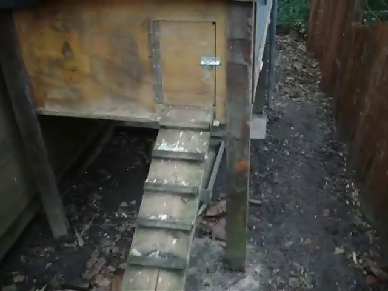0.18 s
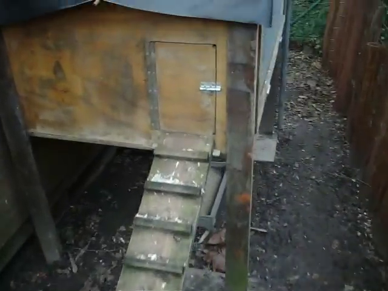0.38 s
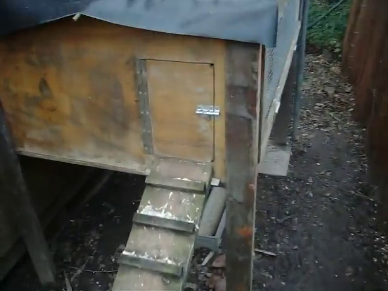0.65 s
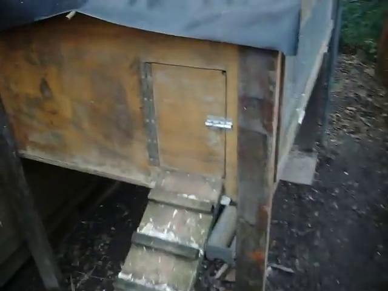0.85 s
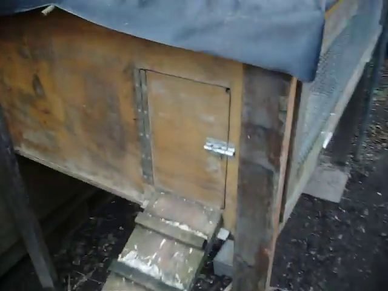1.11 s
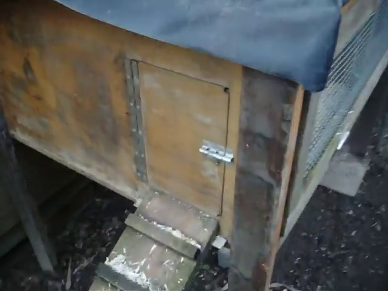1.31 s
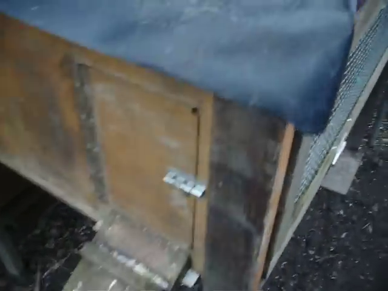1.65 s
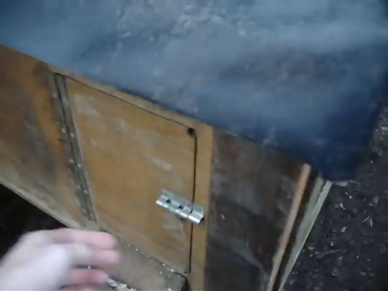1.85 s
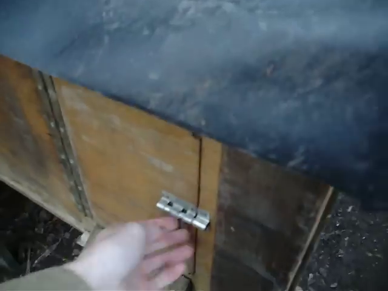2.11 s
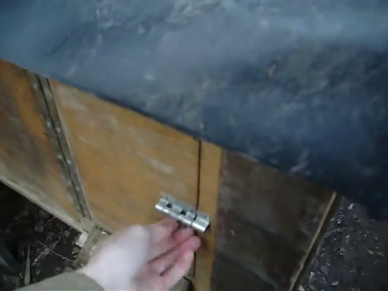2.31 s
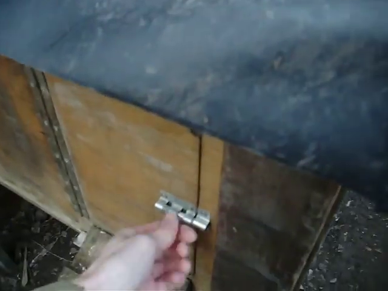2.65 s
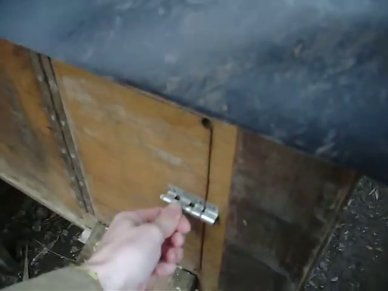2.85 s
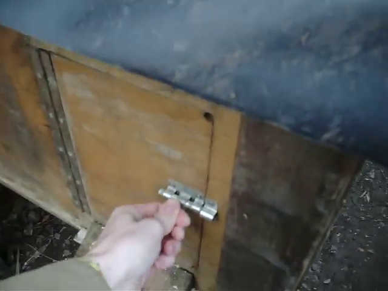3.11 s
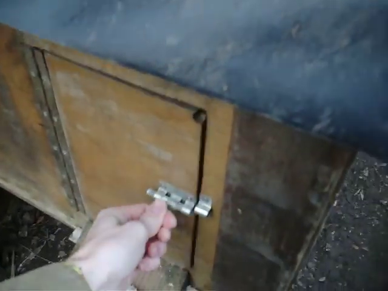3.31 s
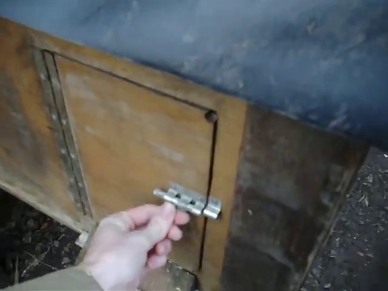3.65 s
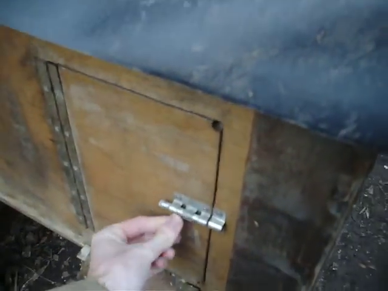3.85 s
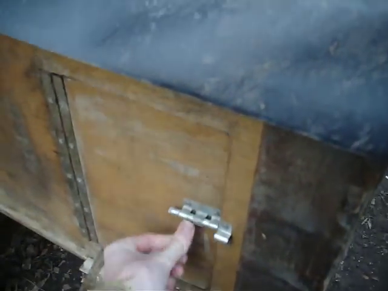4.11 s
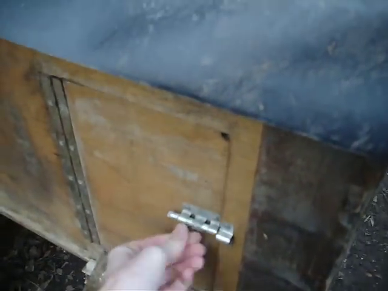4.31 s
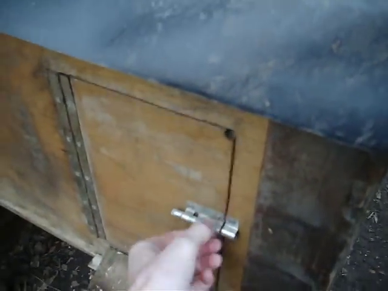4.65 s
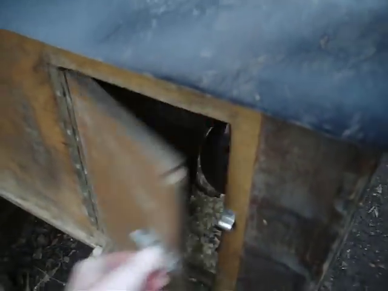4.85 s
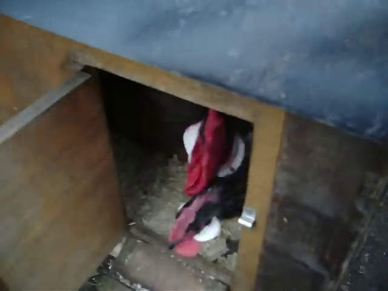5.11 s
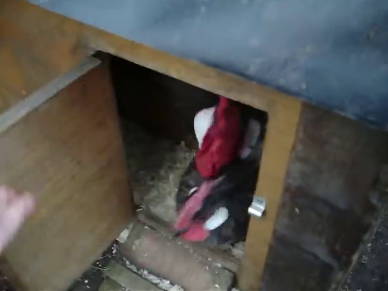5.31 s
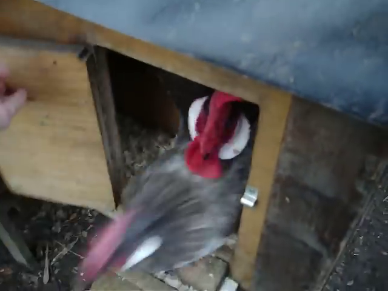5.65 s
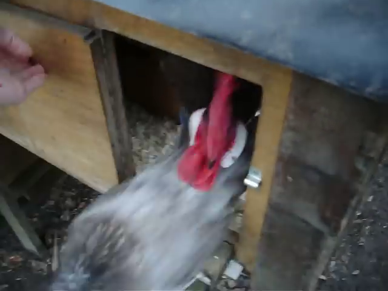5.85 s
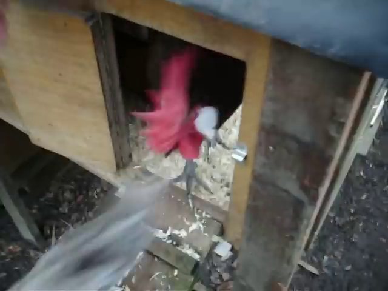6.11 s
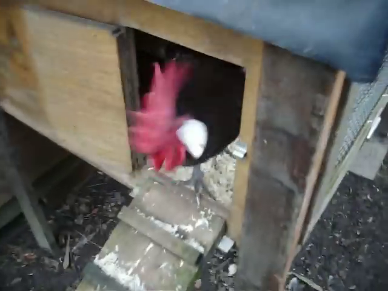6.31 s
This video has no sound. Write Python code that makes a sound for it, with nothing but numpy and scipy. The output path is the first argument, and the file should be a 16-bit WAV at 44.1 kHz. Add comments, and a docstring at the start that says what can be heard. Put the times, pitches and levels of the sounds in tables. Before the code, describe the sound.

A bird peeps high at the start while a shut-in rooster gives short low clucks in a boxy coop. Cloth rustles, wood knocks and a bolt rattles and ticks close by. Two rough rising squawks burst out, distorted, with a brief squeak between them. The door swings with a weak squeal, then a chicken thuds onto the boards. Dull, band-limited sound with faint yard echo.

```python
"""A rooster shut in a wooden coop clucks and squawks twice: syrinx pulses and air through throat resonances.
A hand slides the bolt, which perhaps squeaks, and opens the door; a chicken thumps out: ringing wood and bolt.
Close by, a sleeve rustles and scrapes (shaped noise); a small bird peeps and a hinge squeals (gliding tones).
A distant rumble of noise lies behind, and the near sounds echo round the yard.
The camera's gain control ducks the yard after loud sounds and creeps back; the squawks overload it."""
import sys
import numpy as np
from scipy import signal
from scipy.fft import rfft, irfft
from scipy.io import wavfile
from scipy.ndimage import uniform_filter1d, minimum_filter1d

SR = 44100
rng = np.random.default_rng(int(sys.argv[2]) if len(sys.argv) > 2 else 0)


def store_pcm(level_fs):
    """Save levels as 16-bit WAV."""
    pcm = np.round(np.clip(level_fs, -1, 1) * 32767).astype(np.int16)
    wavfile.write(sys.argv[1], SR, np.atleast_2d(pcm).T)


N = 285768
TIME = np.arange(N) / SR


def amp(db):
    """Decibels to gain."""
    return 10 ** (np.asarray(db) / 20)


def unit(x):
    """Scales to rms 1."""
    return x / np.sqrt(np.mean(x ** 2) + 1e-20)


def read(points, hz):
    """Reads a spectrum on a log-frequency axis."""
    f, value = np.transpose(points)
    return np.interp(np.log(hz + 1), np.log(f), value)


def curves(rows):
    """Sample times across a table, and each of its columns at those times."""
    s, *columns = np.transpose(rows)
    t = np.arange(s[0], s[-1], 1 / SR)
    return [t] + [np.interp(t, s, c) for c in columns]


def add(mix, s, sound):
    """Mixes a sound in from time s, dropping what falls outside the mix."""
    start = round(s * SR)
    sound = sound[max(-start, 0):]
    part = mix[max(start, 0):][:len(sound)]
    part += sound[:len(part)]


def noise(size, shape):
    """Noise whose spectrum is shape(Hz), at rms 1 over at least half a second."""
    total = max(size, SR // 2)
    spectrum = rfft(rng.standard_normal(total))
    shaped = irfft(spectrum * shape(np.fft.rfftfreq(total, 1 / SR)), total)
    return unit(shaped)[:size]


def wobble(size, hz):
    """Random drift, mostly slower than the given rate."""
    return noise(size, lambda f: np.exp(-(f / hz) ** 2))


def resonate(x, hz, width):
    """A two-pole resonance of gain 1 at its peak."""
    return signal.lfilter(*signal.iirpeak(hz, hz / width, SR), x)


def glide(x, hz, width):
    """A resonance of gain 1 that follows a curve: shift down to zero, smooth, shift back."""
    turn = np.exp(2j * np.pi * np.cumsum(hz) / SR)
    r = np.exp(-np.pi * width / SR)
    smooth = signal.lfilter([1 - r], [1, -r], x / turn)
    return 2 * (turn * smooth).real


def low_pass(x, hz):
    """A steep band limit by a symmetric filter, so nothing is delayed."""
    taps = signal.firwin(121, hz, window=("kaiser", 6), fs=SR)
    return signal.oaconvolve(x, taps, "same")


def echo(x, t60_of):
    """Scattered reflections, as a noise tail that builds briefly and dies at its own rate in each band."""
    hz, t, z = signal.stft(rng.standard_normal(SR), SR, nperseg=256)
    decay = amp(-60 * t / t60_of(hz)[:, None])
    tail = signal.istft(z * decay, SR, nperseg=256)[1]
    tail *= np.minimum(np.arange(len(tail)) / (0.0059 * SR), 1) ** 2
    return signal.fftconvolve(x, tail / np.linalg.norm(tail))[:N]


def background():
    """Distant rumble and wash as shaped noise, with clothes close by that rustle at each move of the arm."""
    # colour of the distant yard: f/Hz, relative level per Hz/dB
    yard_colour = [(15, 2), (35, -9), (54, 8), (75, -1.5), (110, -7), (200, -7), (350, -10.5), (720, -13),
                   (1050, -11), (1350, -16), (1700, -24.5), (3000, -26.5), (6000, -34.5)]
    # movements of the arm that rustle the sleeve: t/s at the peak, level/dB, half-length/s
    arm_moves = [(.62, -27.5, 0.19), (1.664, -30.5, 0.18), (5.698, -38.5, 0.9)]
    cloth_colour = [(300, -26.0), (1500, -12), (3000, -6), (5500, -12.0)]  # f/Hz, relative level/dB
    yard_db, cloth_db = -20.5, -35.5  # the yard, and clothes at rest
    yard = noise(N, lambda f: amp(read(yard_colour, f)))
    yard = yard * amp(yard_db + 1.5 * wobble(N, 6.2))
    cloth = noise(N, lambda f: amp(read(cloth_colour, f)))
    cloth = unit(cloth * amp(2.8 * wobble(N, 25) + 2.2 * wobble(N, 500)))  # slow and fine unevenness
    moves = sum(amp(db) * np.exp(-((TIME - s) / length) ** 2) for s, db, length in arm_moves)
    return yard + (amp(cloth_db) + moves) * cloth


def whistle(hz, waver, flutter_db):
    """A thin gliding tone that wavers in pitch and flutters in level."""
    turns = np.cumsum(hz * (1 + waver * wobble(len(hz), 200))) / SR
    return unit(np.sin(2 * np.pi * turns) * amp(flutter_db * wobble(len(hz), 60)))


def peeps():
    """A small bird: each peep bends through one arc of pitch while it swells and fades."""
    # peeps: start t/s, length/s, level/dB, pitch f/Hz at the start, in the middle, at the end
    bird_calls = [(0, 0.086, -11, 3270, 3035, 3330), (0, 0.1, -22, 4450, 4920, 4100),
                  (0.071, .032, -10.5, 3280, 3715, 3490), (2.147, 0.085, -11, 3650, 3662, 3610),
                  (2.653, 0.024, -27.5, 3180, 3130, 2980), (4.185, 0.04, -34, 3450, 3350, 3470)]
    out = np.zeros(N)
    for s, length, db, start_hz, middle_hz, end_hz in bird_calls:
        u = np.linspace(0, 1, round(length * SR))
        arc = np.polyfit([0, .5, 1], [start_hz, middle_hz, end_hz], 2)
        tone = whistle(np.polyval(arc, u), waver=0.0069, flutter_db=1.5)
        add(out, s, amp(db) * np.sin(np.pi * u ** 0.52) * tone)
    return out


def pulses_and_puffs(pitch_hz, rough, jitter):
    """Unsteady pulses, as from a syrinx, mixed with a puff of air in each cycle."""
    size = len(pitch_hz)
    turns = np.cumsum(pitch_hz * (1 + jitter * wobble(size, 220))) / SR
    pulses = 0
    for k in range(1, 36):
        kept = np.clip((6500 - k * pitch_hz) / 500, 0, 1)  # harmonics fade out from 6000 to 6500 Hz
        pulses = pulses + np.cos(2 * np.pi * k * turns) * kept
    puffs = (0.19 + np.exp(-(turns % 1) / 0.5)) * noise(size, np.ones_like)
    rough = np.clip(rough, 0, 1)
    return (1 - rough) * unit(pulses) + rough * unit(puffs)


def clucks_and_squeak():
    """Clucks are a few uneven pulses, rising in pitch, through resonances; a squeak is made the same way."""
    # clucks, and at 3.85 and 3.892 s a squeak near 800 Hz, perhaps of the bolt, made the same way:
    # t/s at the peak, level/dB, half-length/s, pitch f/Hz at the peak,
    # first resonance f/Hz (the throat in a cluck), second f/Hz, second's relative level/dB
    cluck_and_squeak_rows = [(.001, 1, 0.0073, 646, 1303, 2090, -19),
                             (0.096, -17, 0.014, 274, 840, 2250, -8),
                             (.261, -14.5, 0.0073, 226.4, 1075, 2290, -13),
                             (0.451, -12, 0.014, 233.1, 1140, 2210, -8.5),
                             (.608, -10, 0.013, 260.5, 1040, 2370, -10),
                             (1.211, -24, 0.013, 259.4, 1110, 2210, -7.5),
                             (1.334, -13, 0.012, 232.4, 930, 2190, -14.5),
                             (1.572, -14, 0.014, 231.2, 887, 2625, -11.5),
                             (1.982, -7, 0.014, 258, 1117, 2250, -14.5),
                             (2.712, -14, 0.035, 199.2, 557, 1980, -13.5),
                             (3.008, -11.5, 0.012, 247.8, 712, 1910, -12.5),
                             (3.258, -8, 0.014, 223.3, 1250, 2090, -16),
                             (3.85, -21, 0.027, 800, 783, 2330, -6),
                             (3.892, -8, 0.0037, 787, 914, 2330, -3.5),
                             (4.044, -1, 0.0065, 233.9, 704, 1836, -15.5),
                             (4.812, -6.5, 0.0098, 230, 677, 1380, -17),
                             (5.805, 0, 0.0036, 225, 680, 1810, -2),
                             (5.818, -3.5, 0.007, 332, 705, 1870, -7)]
    out, t = np.zeros(N), np.arange(-SR // 12, SR // 12) / SR
    for s, db, length, hz, first_hz, second_hz, second_db in cluck_and_squeak_rows:
        drive = pulses_and_puffs(hz * np.exp(5 * t), rough=.3, jitter=.14)
        drive = drive * amp(2 * wobble(len(t), 200))
        first = resonate(resonate(drive, first_hz, 260), first_hz, 370)
        second = resonate(resonate(drive, second_hz, 290), second_hz, 730)
        low = resonate(resonate(drive, 370, 420), 210, 630)  # the chest in a cluck
        sound = first - amp(second_db) * second + amp(-4) * low
        add(out, s + t[0], amp(db) * unit(sound) * np.exp(-abs(t / length) ** 2.55))
    return out


def scrapes():
    """Short rubs: bands of grainy friction noise that swell and fade."""
    # scrapes of sleeve, feet, straw and bolt, and dull rubs of handling:
    # t/s at the peak, level/dB, half-length/s, centre f/Hz, width/Hz
    rubs = [(.836, -18.5, 0.02, 3840, 3200), (.89, -25, 0.026, 4570, 1800), (.926, -15, 0.0063, 690, 1780),
            (0.95, -21.5, 0.019, 2180, 3600), (.98, -16, 0.0077, 2300, 2870),
            (0.988, -17.5, .079, 170, 216), (1.787, -23, 0.019, 3900, 2970),
            (1.909, -26, 0.026, 3930, 2940), (2.163, -22, 0.04, 3460, 3470),
            (2.179, -12.5, 0.028, 690, 1780), (2.21, -17, 0.044, 130, 90.5),
            (2.51, -11.5, 0.0073, 1300, 2600), (2.832, -16, .011, 3020, 3800),
            (2.846, -8, 0.016, 1150, 1650), (3.893, -22.5, 0.006, 4300, 2630),
            (4.304, -15.5, 0.016, 2590, 850), (4.312, -19.5, 0.021, 700, 1360), (4.388, -21, 0.031, 56, 35),
            (4.647, -8, 0.016, 2560, 736), (5.13, -22, 0.058, 1500, 2600),
            (5.599, -19.5, 0.011, 1800, 3000), (5.847, -25, 0.039, 1300, 905)]
    out, t = np.zeros(N), np.arange(-SR // 10, SR // 10) / SR
    for s, db, length, hz, width in rubs:
        rub = noise(len(t), lambda f: 1 / (1 + (2 * (f - hz) / width) ** 4))
        rub = rub * amp(2.4 * wobble(len(t), 590))
        add(out, s + t[0], amp(db) * unit(rub) * np.exp(-abs(t / length) ** 1.74))
    return out


def ring(modes, t, spread):
    """Dying modes, a little different in level and pitch at each blow."""
    chance = rng.standard_normal((len(modes), 2))
    out = 0
    for (hz, db, t60), (a, b) in zip(modes, chance):
        decay = amp(db + 0.73 * a - 60 * t / t60)
        out = out + decay * np.sin(2 * np.pi * hz * (1 + spread * b) * t)
    return out


def knocks():
    """A blow thuds in the boards, rattles the bolt and gives a short tick."""
    # knocks on the coop: t/s, relative levels/dB of wood thud, bolt clack and sharp tick
    blows = [(0.973, -11.5, -17, -16), (1.011, -18, -19.5, -33), (1.052, -17, -39, -35.5),
             (1.208, -15, -42, -39), (1.962, -20, -18.5, -15.5), (2.19, -13, -27.5, -17),
             (2.299, -7, -17, -29), (2.305, -15, -29, -14.5), (2.338, -22, -24, -24),
             (2.481, -19, -24.5, -27.5), (2.508, -18, -9.5, -14.5), (2.674, -11.5, -19, -36.5),
             (2.852, -6.5, -6.5, -5.5), (3.048, -13, -24, -14), (4.115, -18.5, -26, -3.5),
             (4.328, -3.5, -18.5, -20.5), (4.443, -38, -27, -7.5), (4.863, -34, -19.5, -9.5),
             (4.967, -38, -29, -11.5), (5.086, -29, -10.5, -10.5), (5.293, -5.5, -35.5, -29),
             (5.602, -21.5, -28, -18), (5.933, 10, -15, -14), (6.012, -9.5, -15, -8),
             (6.368, -20, -24, -8.5)]
    # modes of the boards: mean f/Hz, mean relative level/dB, t60/s
    wood_modes = [(110, 5.5, 0.0096), (195.2, 0, 0.1), (265.8, -3, 0.17), (386, -10, 0.11), (466, -2, .036),
                  (684, -13.5, .076), (865, -7, 0.0095)]
    # modes of the bolt: mean f/Hz, mean relative level/dB, t60/s
    bolt_modes = [(900, -6.5, 0.014), (1727, 6.5, 0.03), (2280, 10.5, .046), (2587, 7, .033),
                  (2960, -3.5, 0.056), (3440, -15.5, .031), (4460, -11, 0.18)]
    out, t = np.zeros(N), np.arange(SR // 5) / SR
    contact = 1 - np.exp(-t / 0.0013)  # wood gives a little before it rings
    for s, wood_db, bolt_db, tick_db in blows:
        tick = noise(len(t), lambda f: np.exp(-((f - 4300) / 1500) ** 2))
        tick = tick * (np.exp(-t / 0.0053) + amp(-27.0) * np.exp(-t / 0.037))
        rattle = ring(bolt_modes, t, spread=0.023) * amp(2.8 * wobble(len(t), 400))
        body = amp(wood_db) * ring(wood_modes, t, spread=0.078) + amp(bolt_db) * rattle / 2
        add(out, s, contact * body + amp(tick_db) * tick / 2)
    return out


def squawks():
    """The syrinx tightens from a creak to a shriek; pitch, throat and beak all follow its tension."""
    # squawks: start t/s, effort level/dB, time to tighten/s, length before release/s,
    # creak pitch f/Hz, shriek pitch f/Hz before the climb, roughness (0-1) when tight, release/s
    squawk_rows = [(3.307, 16.5, .046, 0.14, 139, 463.6, 0.33, 0.037),
                   (4.461, 14.5, .038, 0.13, 159.8, 436.6, 0.46, 0.049)]
    # upper resonances of throat and beak: f/Hz, width/Hz, relative level/dB
    throat_modes = [(1160, 110, -5), (1626, 150, -9.5), (2280, 51, -17.5), (4490, 370, -20.5)]
    # air resonances of the coop, which boom when a harmonic meets them: f/Hz, width/Hz, relative level/dB
    coop_modes = [(526.6, 39, 4), (962, 41, 8)]
    attack_s, swell_db, release_db = .012, 20, 22.5  # swells all through its length, then drops away
    climb_hz_per_s, sag_hz_per_s = 520, 2200  # pitch creeps up while he pushes and sags on release
    slack_rough = 0.13  # extra roughness while the syrinx is slack
    throat_shut_hz, throat_open_hz = 306, 712  # the main resonance rises as the throat opens
    beak_shut_db, beak_open_db = -5.5, 1  # and the upper resonances come out
    out = np.zeros(N)
    for s, effort_db, tighten, length, creak_hz, shriek_hz, rough, release in squawk_rows:
        t = np.arange(0, length + release, 1 / SR)
        pushed, after = np.minimum(t, length), np.maximum(t - length, 0)
        tension = 1 - np.exp(-(t / tighten) ** 1.8)
        hz = creak_hz + (shriek_hz - creak_hz) * tension
        hz = hz + climb_hz_per_s * pushed - sag_hz_per_s * after
        throat_hz = throat_shut_hz + (throat_open_hz - throat_shut_hz) * tension
        open_db = beak_shut_db + (beak_open_db - beak_shut_db) * tension ** 0.59
        drive = pulses_and_puffs(hz, rough + slack_rough * (1 - tension + after / release), jitter=.035)
        upper = sum(amp(db) * resonate(resonate(drive, f, w), f, 3 * w) for f, w, db in throat_modes)
        chest = amp(-11.0) * glide(glide(drive, hz, 170), hz, 270)  # follows the pitch itself
        throat = glide(glide(drive, throat_hz, 340), throat_hz, 420)
        voice = throat + chest + amp(open_db) * upper
        voice /= np.sqrt(uniform_filter1d(voice ** 2, size=500) + 1e-12)  # even out the level
        voice *= amp(3.84 * wobble(len(t), 310))  # uneven cycles make it hoarse
        level_db = effort_db - swell_db * (1 - pushed / length) - release_db * np.sqrt(after / release)
        fade = np.minimum(t / attack_s, 1) ** 1.4 * signal.windows.tukey(len(t), .03)
        add(out, s, amp(level_db) * voice * fade)
    return out + sum(amp(db) * resonate(out, f, w) for f, w, db in coop_modes)


def hinge():
    """A faint, unsteady squeal that sinks as the door swings."""
    # squeal of the hinge: t/s, mean f/Hz, level/dB
    squeal = [(4.92, 2230, -35), (5.08, 2070, -44), (5.38, 2044, -38), (5.49, 1880, -31), (5.6, 1860, -44)]
    out = np.zeros(N)
    t, hz, db = curves(squeal)
    tone = whistle(hz, waver=.028, flutter_db=4)
    add(out, t[0], amp(db) * tone * signal.windows.tukey(len(t), .08))
    return out


def scene():
    """Clucks, squeak and squawks ring in the coop; all the near sounds echo faintly round the yard."""
    # ring of the fenced yard: f/Hz, t60/s
    yard_decay = [(150, .31), (520, 1.05), (1000, 1.1), (2000, 0.6), (6000, 1.5)]
    in_coop = clucks_and_squeak() + squawks()
    in_coop = in_coop + amp(-5.0) * echo(in_coop, lambda hz: np.full(len(hz), .09))  # coop t60 in s
    near = in_coop + knocks() + scrapes() + peeps() + hinge()
    yard_echo = amp(-26) * echo(near, lambda hz: read(yard_decay, hz))
    return (near + yard_echo + background())[None]


def gain_control(x, threshold_db, share, attack, recover_s, start_db):
    """Starts turned down; cuts quickly on loud sounds, holds, then eases back, more slowly near full gain."""
    level_db = 10 * np.log10(abs(uniform_filter1d(x ** 2, size=300)) + 1e-12)
    cut_db = share * np.maximum(level_db - threshold_db, 0)
    # hold the deepest cut of the last 4001 samples
    held_db = -minimum_filter1d(-cut_db, size=4001, origin=2000, mode="constant")
    ease = np.exp(-TIME / recover_s)
    cut_db = np.maximum.accumulate(np.maximum(held_db / ease, start_db)) * ease
    r = np.exp(-1 / (attack * SR))  # attack in s
    smooth_db = signal.lfilter([1 - r], [1, -r], cut_db - start_db)
    return x * amp(-start_db - smooth_db)


def record(dry):
    """The camera's gain control, hiss, overload and narrow band; the tallest peaks clip once more after it."""
    hiss_db, ceiling = -51.5, .7
    cutoff_hz, edge_hz = 5750, 15800  # band limits before and after the last clip
    x = gain_control(dry[0], threshold_db=-14, share=0.75, attack=0.006, recover_s=0.39, start_db=14.5)
    x = x + amp(hiss_db) * noise(N, np.ones_like)
    x = x / (1 + (x / ceiling) ** 8) ** (1 / 8)  # rounded overload
    x = low_pass(x * signal.windows.tukey(N, .0005), cutoff_hz)
    return low_pass(np.clip(x, -ceiling, ceiling), edge_hz)[None]


dry = scene()
out = record(dry)
store_pcm(out)
```